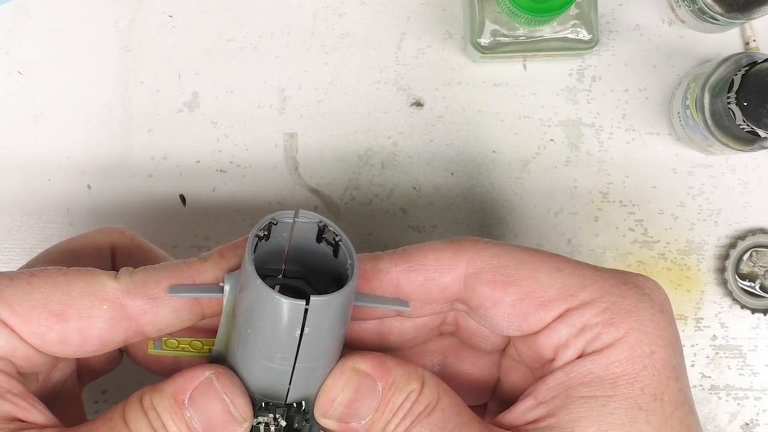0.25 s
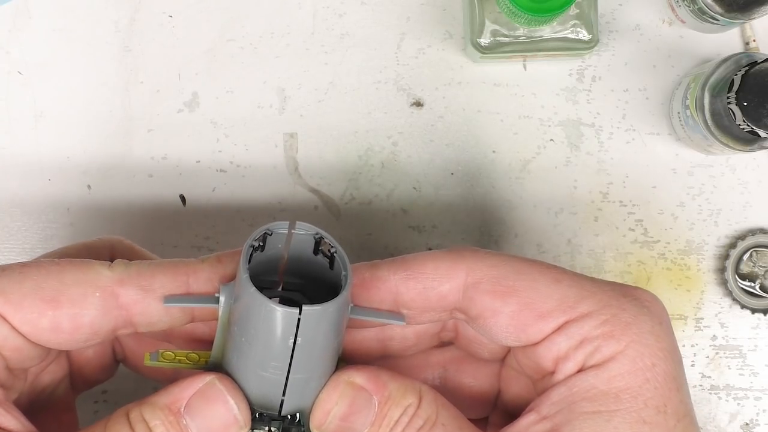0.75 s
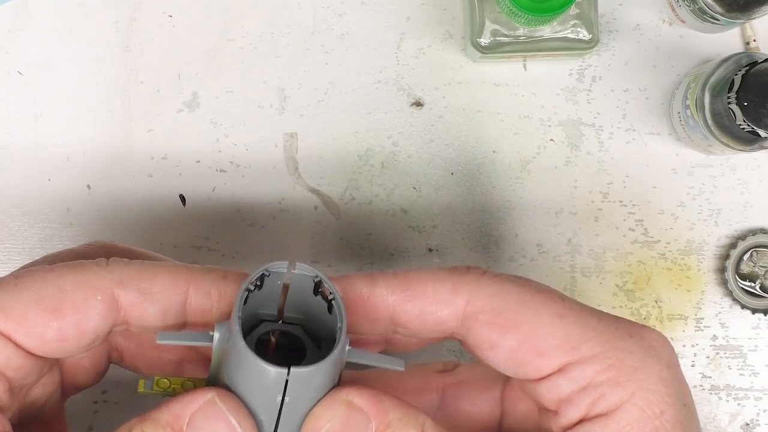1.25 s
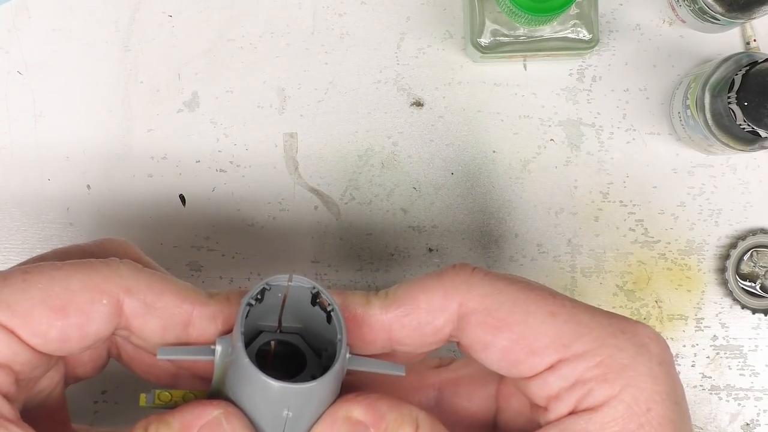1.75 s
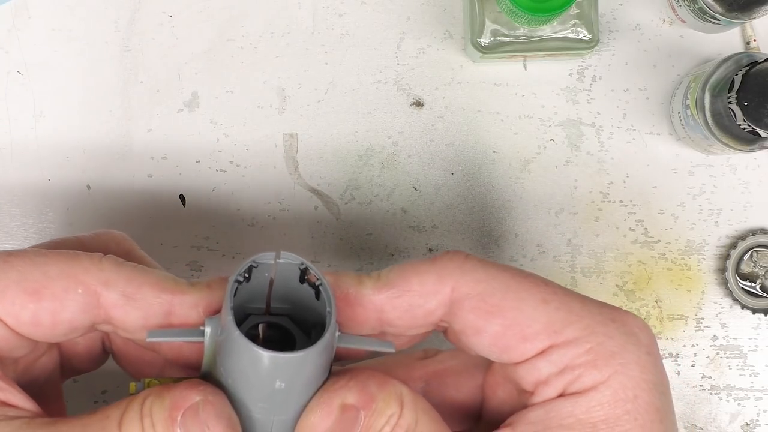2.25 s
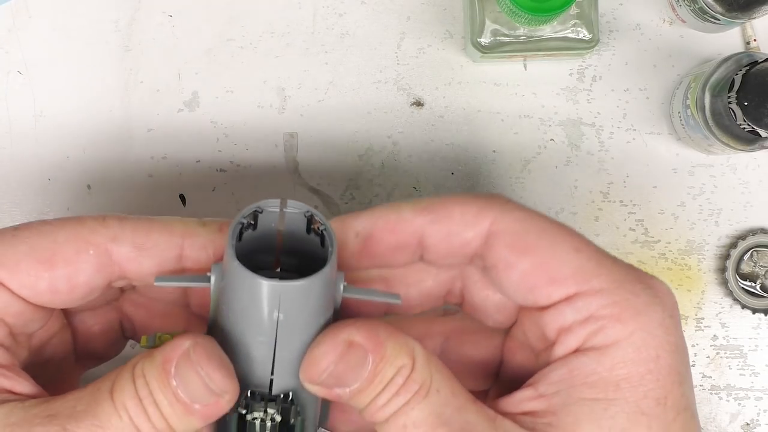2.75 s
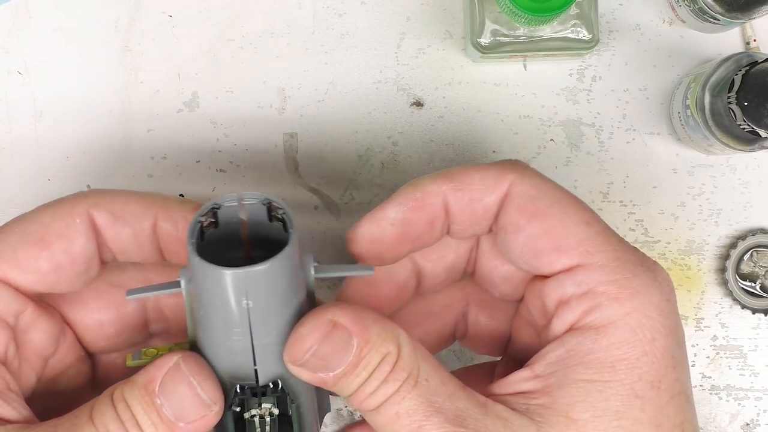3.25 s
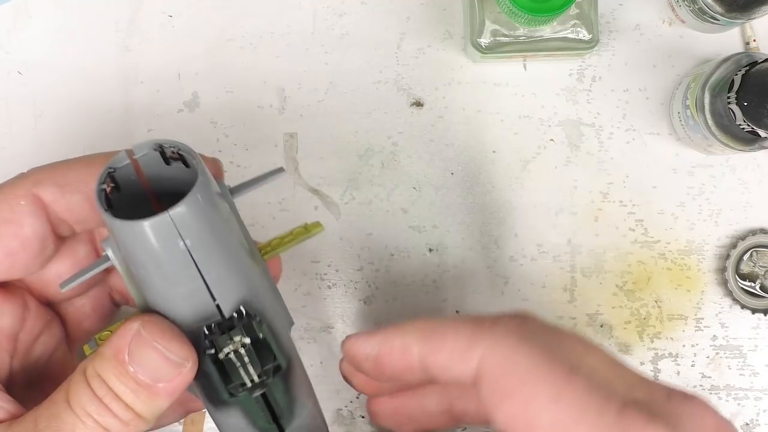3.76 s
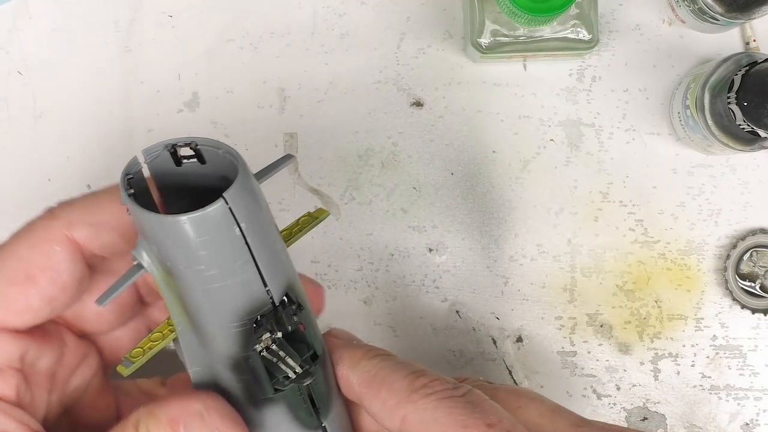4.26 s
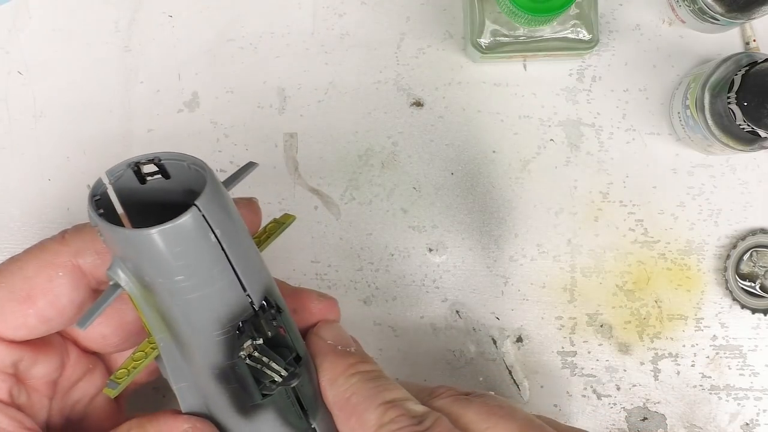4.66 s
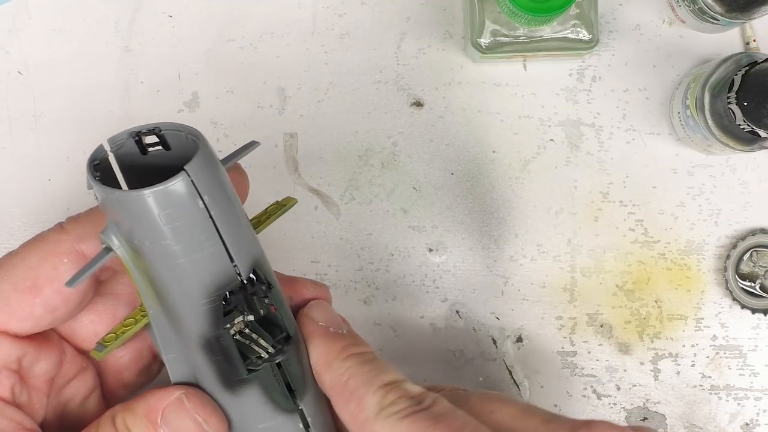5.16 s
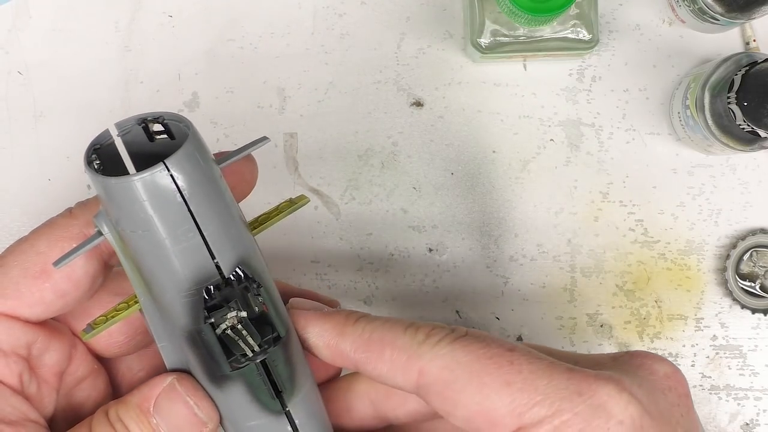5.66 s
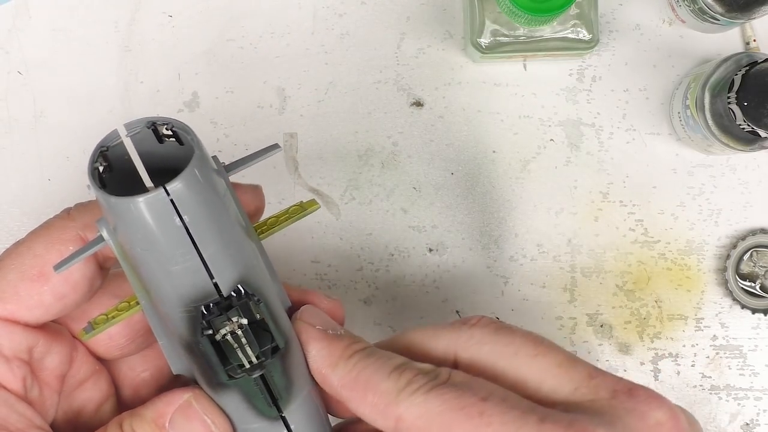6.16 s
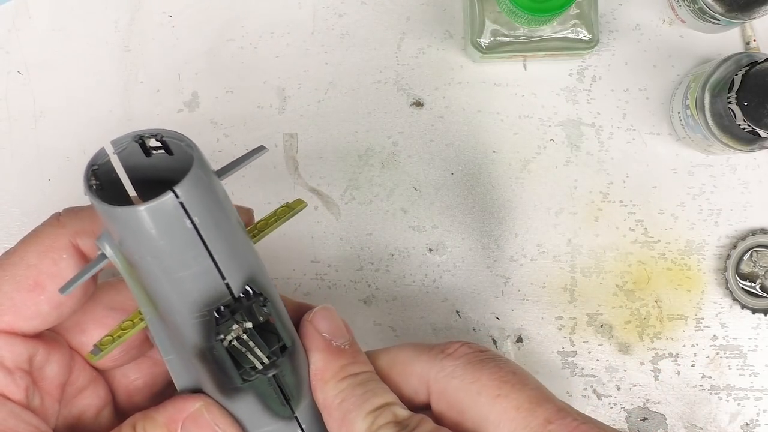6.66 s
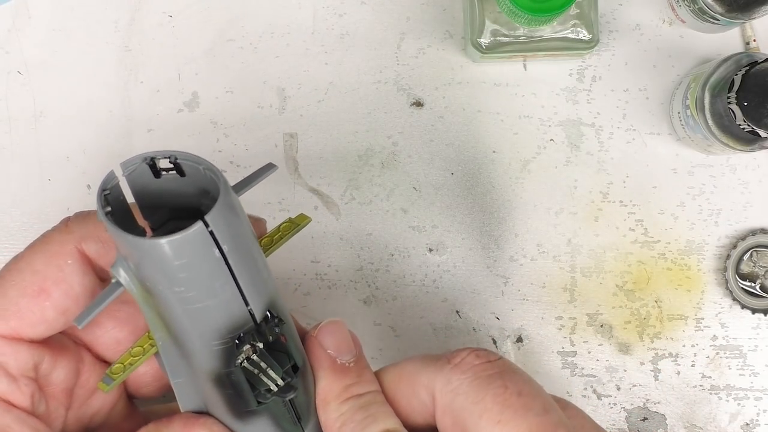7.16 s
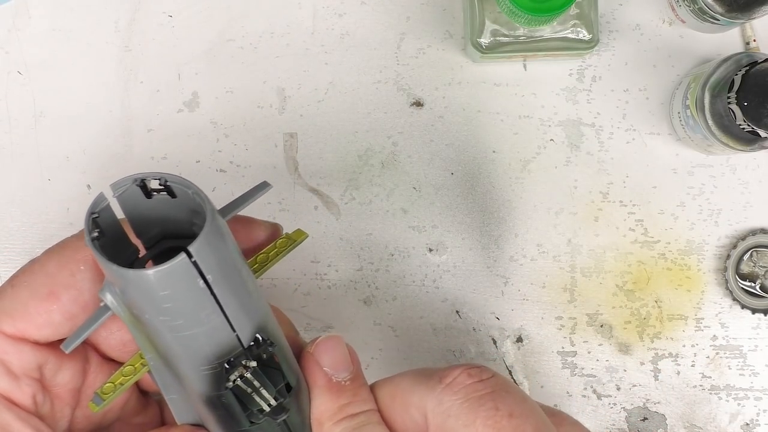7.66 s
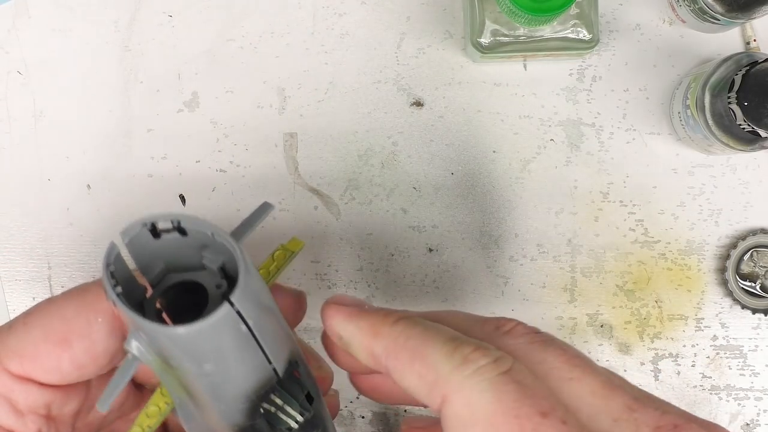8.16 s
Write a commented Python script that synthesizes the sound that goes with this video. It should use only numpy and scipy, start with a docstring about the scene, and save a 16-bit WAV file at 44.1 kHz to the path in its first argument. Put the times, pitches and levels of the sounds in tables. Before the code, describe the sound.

Close, dry plastic clicks and small ticks with light skin scuffs, the loudest snap late, above soft hiss, hum and a distant motor.

```python
"""Hollow plastic shell snapped together

Two halves of a hollow plastic model fuselage are pressed together by hand over a workbench.
Edges tick and snap home: damped shell modes under short noise cracks. Fingertips slide (grainy
filtered noise), squeak (jittered sines) and creak as the grip shifts; a small room answers.
Behind: rumble and mains hum, a faint electric buzz, a far motor, faint tones and microphone hiss."""
import sys
import numpy as np
from scipy import signal
from scipy.fft import rfft, irfft, next_fast_len
from scipy.io import wavfile
from scipy.ndimage import map_coordinates

SR = 44100
rng = np.random.default_rng(int(sys.argv[2]) if len(sys.argv) > 2 else 0)


def log_audio(samples):
    """Write samples as a 16-bit WAV file to the path given in sys.argv[1]."""
    # one column per channel
    frames = np.atleast_2d(samples).T
    # limit to full scale, then quantise
    limited = np.clip(frames, -1, 1)
    pcm = np.round(limited * 32767).astype(np.int16)
    wavfile.write(sys.argv[1], SR, pcm)


N = 370881

# fingertip slides: peak time t/s, hiss level/dB, shell scrape level/dB, length (rise + fall sigma)/s,
# favoured resonance f/Hz
SLIDES = [(0.95, -51.5, -61, .041, 4400), (1.03, -64.5, -63, 0.099, 4170), (1.197, -52.5, -57, 0.044, 4250),
          (3.015, -65, -69, 0.024, 2600), (3.377, -60, -60.5, 0.016, 3600), (3.44, -76, -62, .06, 1990),
          (3.544, -70, -63.5, 0.022, 2000), (4.047, -70, -68.5, 0.092, 2600),
          (4.164, -68, -57.5, 0.02, 2300), (4.2, -69, -51.5, .025, 3620), (4.31, -61.5, -65, 0.091, 3360),
          (4.489, -63, -68, 0.058, 4430), (4.553, -60.5, -66, .035, 2600), (5.043, -71, -64, 0.21, 2660),
          (5.945, -71, -70.5, .1, 2620), (6.059, -66, -68, 0.019, 2620), (6.134, -73, -63, .09, 2600),
          (6.98, -72, -66, 0.097, 2600), (7.926, -66, -63.5, 0.088, 2600), (8.40, -56, -60, 0.034, 2330)]


def amp(db):
    """Decibels to amplitude ratio."""
    return 10 ** (np.asarray(db) / 20)


def unit(x):
    """x scaled to rms 1."""
    return x / np.sqrt(np.mean(x ** 2) + 1e-20)


def clock():
    """Sample times in seconds."""
    return np.arange(N) / SR


def along(points, hz):
    """Interpolate (f/Hz, value) points on a log frequency axis."""
    f, v = np.transpose(points)
    return np.interp(np.log(hz + 1), np.log(f + 1), v)


def wobble(rate_hz):
    """Smooth random curve with rate_hz knots a second."""
    knots = rng.standard_normal(4096)
    coarse_s = np.arange(N // 32 + 1) * 32 / SR
    curve = map_coordinates(knots, [coarse_s * rate_hz], mode="wrap")
    return np.interp(clock(), coarse_s, curve)


def swell(peak_s, rise_s, fall_s):
    """Gaussian bell peaking at peak_s, with separate rise and fall sigmas."""
    t = clock() - peak_s
    sigmas = t / np.where(t < 0, rise_s, fall_s)
    return np.exp(-.5 * np.minimum(sigmas ** 2, 100))


def tone(hz, waver_rad):
    """Sine of rms 1 with randomly wandering phase."""
    phase = 2 * np.pi * np.cumsum(np.broadcast_to(hz, N)) / SR
    return np.sqrt(2) * np.sin(phase + waver_rad * wobble(7.6))


def filtered(x, response):
    """Apply a real response of frequency, zero phase."""
    n = x.shape[-1]
    m = next_fast_len(n + 8192, True)
    return irfft(rfft(x, m) * response(np.fft.rfftfreq(m, 1 / SR)), m)[..., :n]


def rush(spectrum):
    """Stereo noise of rms 1, its left-right correlation set per frequency by a mid/side split."""
    # left-right correlation: f/Hz, correlation
    likeness = [(25, .25), (60, 0.91), (130, 0.58), (290, 0.3), (640, 0.8), (1400, 0.26), (3100, 0.24),
                (6800, 0.87), (15000, 0.39)]

    def mid_side(hz):
        turn = np.arccos(np.clip(along(likeness, hz), -1, 1)) / 2
        return amp(along(spectrum, hz)) * [np.cos(turn), np.sin(turn)]

    mid, side = filtered(rng.standard_normal((2, N)), mid_side)
    return unit(np.array([mid + side, mid - side]))


def placed(x, pan_db):
    """Near source, pan_db louder on the left."""
    return x * amp([[pan_db / 2], [-pan_db / 2]])


def air_hiss(level_db=-62.0):
    """Steady broadband microphone hiss."""
    # hiss spectrum: f/Hz, relative density/dB
    spectrum = [(330, -22), (560, -17.5), (618, -23), (710, -7), (783, -12), (1080, -4.5), (1600, -6),
                (1860, -9), (1940, -4), (2400, -7.5), (3170, -12.5), (3690, -12), (5700, -25.5),
                (10700, -19), (15800, -17)]
    return amp(level_db) * rush(spectrum)


def room_rumble(level_db=-60.5, heave_s=8.28, heave_db=5, heave_sigma_s=.13):
    """Low-frequency room noise, swelling once as the hands shift."""
    # rumble spectrum: f/Hz, relative density/dB
    spectrum = [(20, -21.5), (55, -14.5), (82, -10.5), (98, -3), (122, -3), (150, -11), (200, -13),
                (270, -9.5), (330, -16.5), (470, -18), (570, -32.5), (800, -46), (1500, -85)]
    heave = heave_db * swell(heave_s, heave_sigma_s, heave_sigma_s)
    return amp(level_db + heave) * rush(spectrum)


def mains_hum():
    """Low mains harmonics with wandering phase."""
    # hum lines: f/Hz, rms level/dB
    lines = [(100, -69), (120, -67)]
    return sum(amp(db) * tone(hz, waver_rad=0.71) for hz, db in lines)


def buzz_gain(waver_db=0.9, sink_s=0.13):
    """Level heard in the buzz band: it wavers, and three times dips and comes back."""
    # level dips: onset t/s, nominal depth/dB, onset to start of return/s, return/s
    dips = [(2.58, -14, .1, 0.7), (5.72, -5.5, .1, 1.3), (7.27, -15, .56, .17)]
    t = clock()
    dip_db = 0
    for s, depth_db, down_s, return_s in dips:
        sinking = np.clip((t - s) / sink_s, 0, 1)
        returning = np.clip(1 - (t - s - down_s) / return_s, 0, 1)
        dip_db = dip_db + depth_db * sinking * returning
    return amp(dip_db + waver_db * wobble(7.4))


def electric_buzz(noise_db=-70):
    """Cluster of lines near 2 kHz over a narrow noise band, sharing one gain."""
    # buzz lines: f/Hz, rms level before buzz_gain/dB
    lines = [(1889, -83), (1949, -72), (2008, -75.5), (2126, -76.5), (2186, -80.5), (2250, -76)]
    # buzz noise spectrum: f/Hz, relative density/dB
    band = [(1500, -56), (1850, -5.5), (1970, -9), (2100, -8), (2250, -24), (2450, -22), (3000, -42)]
    buzz = sum(amp(db) * tone(hz, waver_rad=.25) for hz, db in lines)
    return buzz_gain() * (buzz + amp(noise_db) * rush(band))


def motor_gain(idle_db=-67.5):
    """The far motor idles, with slow surges."""
    # motor surges: peak t/s, gain/dB, sigma/s
    surges = [(0.497, 9, 0.51), (7.803, 7, 0.51)]
    return amp(idle_db + sum(db * swell(s, sigma, sigma) for s, db, sigma in surges))


def far_motor(start_hz=237.7, rise_hz_per_s=3.3, noise_db=-5.0, line_db=-6):
    """Exhaust noise plus one line that climbs as the motor slowly gains speed."""
    # f/Hz, relative density/dB
    exhaust = rush([(60, -24), (130, -2.5), (240, 0.5), (480, -1), (600, -12.5),
                    (720, -9), (1200, -24), (3000, -71)])
    line = tone(start_hz + rise_hz_per_s * clock(), waver_rad=0.94)
    return motor_gain() * (amp(noise_db) * exhaust + amp(line_db) * line)


def faint_tones():
    """Sines of fixed nominal pitch that come and go."""
    # tones: f/Hz, rms level at peak/dB, peak t/s, sigma/s
    tones = [(491, -71.5, 8.03, 0.46), (483, -74.5, 5.86, 1.33), (477, -69.5, .3, 0.58),
             (509, -75, .5, 0.97), (557, -70.5, 8.66, 0.83), (660, -75, 0.57, 0.44), (685, -84, 2.8, 5.6),
             (200, -74.5, 5.1, 3.4), (1350, -75, 3.35, 0.24)]
    return sum(amp(db) * swell(s, sigma, sigma) * tone(hz, waver_rad=1.0)
               for hz, db, s, sigma in tones)


def background():
    """Sum of the layers behind the hands."""
    return (air_hiss() + room_rumble() + mains_hum() + electric_buzz()
            + far_motor() + faint_tones())


def room(x, build_up_s=0.0063, side_db=-4):
    """Noise-tail reverb: the walls' answer builds up, then each frequency decays at its own rate."""
    # wall decay: f/Hz, t60/s
    walls = [(300, 0.53), (1200, 0.74), (2200, 0.58), (4000, 0.57), (8000, 0.41), (15000, 0.46)]
    hz, t, z = signal.stft(rng.standard_normal((2, int(.7 * SR))), SR, nperseg=256)
    decay = amp(-60 * t / along(walls, hz)[:, None])
    shape = decay * (1 - np.exp(-t / build_up_s))
    # f/Hz, relative level/dB
    colour_db = along([(300, 4), (2000, 1.0), (7000, 5.5), (11000, -2.0), (15000, -4.0)], hz)
    mid, side = signal.istft(z * shape * amp(colour_db)[:, None], SR, nperseg=256)[1]
    side = amp(side_db) * side
    tail = np.array([mid + side, mid - side]) / np.linalg.norm(mid)
    return signal.fftconvolve(x[None], tail, axes=1)[:, :N]


def diffused(x, blur_hz=380):
    """The walls hear the shell from every side: one even burst, its spectral peaks blurred."""
    power = np.abs(rfft(x)) ** 2
    offset_hz = np.arange(-400, 401) * SR / len(x)
    bell = np.exp(-(2 * offset_hz / blur_hz) ** 2)
    power = np.abs(signal.fftconvolve(power, bell / bell.sum(), "same"))
    # zero-phase burst, centred 5 ms in
    return np.roll(irfft(np.sqrt(power), len(x)), SR // 200)


def palms(grain_db=2.5):
    """The hands tighten their grip: soft, dull creaks of skin from grainy noise."""
    # creak spectrum: f/Hz, relative density/dB
    spectrum = [(200, -9), (400, -5), (580, -15), (720, 0.5), (950, -5.5), (1400, -8), (2200, -26)]
    # grip shifts: peak t/s, level/dB, sigma/s
    grips = [(1.37, -68.5, 0.15), (1.625, -70.5, 0.09), (3.098, -71.5, 0.11), (3.38, -69, 0.074),
             (8.25, -66, 0.33)]
    grains = rng.standard_normal(N) * amp(grain_db * wobble(110))
    creaks = unit(filtered(grains, lambda hz: amp(along(spectrum, hz))))
    return creaks * sum(amp(db) * swell(s, sigma, sigma) for s, db, sigma in grips)


def squeaks(jitter=0.027, flutter_db=4.0):
    """Nearly regular stick and slip of skin: thin, rough whistles on a jittered clock."""
    # squeaks: peak t/s, f/Hz, peak amplitude before flutter/dB, sigma/s
    strokes = [(3.298, 6370, -72, .012), (4.182, 7570, -50, 0.0095), (4.208, 7570, -50, 0.0091),
               (5.07, 11800, -70, .025), (7.163, 11900, -68, .012)]
    jittered_s = np.cumsum(1 + jitter * wobble(1300)) / SR
    whistle = sum(amp(db) * swell(s, sigma, sigma) * np.sin(2 * np.pi * hz * jittered_s)
                  for s, hz, db, sigma in strokes)
    return whistle * amp(flutter_db * wobble(300))


def fingers(grain_db=1.0, judder_db=2.0, favour_db=10, width_hz=170, rise_share=0.38):
    """Skin ridges catch and let go: grainy hiss, plus a duller scrape at the shell resonance."""
    # sliding skin spectrum: f/Hz, relative density/dB
    skin = [(710, -37), (1200, -20), (1540, -19), (1990, -1), (2530, -29), (3310, -7), (4280, -6),
            (5730, -5.5), (9420, 1), (14000, -3), (15800, -6)]
    # shell under a finger: f/Hz, relative density/dB
    rubbed = [(1000, -20), (1350, -11), (1650, -7), (2000, 3), (2600, -2), (3100, -6), (4400, -8),
              (5400, -20), (8000, -32)]
    slips = rng.standard_normal(N) * amp(grain_db * wobble(400) + judder_db * wobble(70))
    hiss = unit(filtered(slips, lambda hz: amp(along(skin, hz))))
    out = np.zeros(N)
    for s, hiss_db, shell_db, length_s, ring_hz in SLIDES:
        near = np.abs(clock() - s) < .4

        def shell(hz):
            resonance_db = favour_db / (1 + ((hz - ring_hz) / width_hz) ** 2)
            return amp(along(rubbed, hz) + resonance_db)

        scrape = unit(filtered(slips[near], shell))
        stroke = swell(s, rise_share * length_s, (1 - rise_share) * length_s)[near]
        out[near] += stroke * (amp(hiss_db) * hiss[near] + amp(shell_db) * scrape)
    return out


def contacts():
    """Plastic touches as rows: t/s, level/dB, crack/dB, room send/dB, hardness/(dB/oct), place."""
    # snaps (an edge catches, lets go, rebounds): t/s, level/dB, crack re ring/dB, hardness/(dB/oct),
    # catch lead/s, catch re snap/dB, rebound delay/s, rebound re snap/dB,
    # rebound hardness/(dB/oct), place
    snaps = [(1.5285, -25, -7.5, 1, 0.0031, -7.5, .0083, -15, -11, "nose"),
             (4.1762, -35, -12, 0.4, .004, -23, 0.0049, -6, -4, "seam"),
             (7.327, -16.5, -10.5, -2.7, 0.0016, -15, .005, -13, 7.5, "tail")]
    # edge ticks: t/s, ring level as if its energy filled 10 ms/dB, crack re ring/dB,
    # hardness/(dB/oct), place
    ticks = [(.869, -55, -9, -5, "nose"), (.9, -62, -18, -10, "nose"), (1.042, -62, -2, 6, "seam"),
             (1.180, -62, 4, 3, "seam"), (1.364, -63, -6, -2, "nose"), (1.909, -60, -10, 1, "nose"),
             (1.913, -51.5, -10, -10, "nose"), (2.7712, -52, -10.5, -11, "nose"),
             (2.804, -64, -2, -5, "nose"), (2.861, -58, -1, -9, "nose"), (2.892, -49.5, -8, -15, "nose"),
             (3.445, -58, -17, -16, "nose"), (5.388, -60, -6, -1, "seam"), (5.764, -60, -10, -6, "tail"),
             (6.4436, -58, -16, -10, "tail"), (6.926, -53, -18, -4, "nose"), (6.9367, -46, -3.5, 1, "seam"),
             (7.766, -55, -5.5, -8, "tail"), (7.883, -50, -3.5, -10, "tail")]
    # the catch cracks less than the snap, the rebound more
    catch_crack_db, rebound_crack_db = -13, 3.5
    catch_room_db, snap_room_db, rebound_room_db, tick_room_db = -22, -20, -16.5, -15.5
    grit_db, grit_crack_db = -4.5, -5  # level re scrape, crack re ring
    rows = []
    for (s, db, crack_db, hardness, lead_s, catch_db,
         delay_s, rebound_db, rebound_hardness, place) in snaps:
        rows.append((s - lead_s, db + catch_db, crack_db + catch_crack_db, catch_room_db, 0, place))
        rows.append((s, db, crack_db, snap_room_db, hardness, place))
        rows.append((s + delay_s, db + rebound_db, crack_db + rebound_crack_db,
                     rebound_room_db, rebound_hardness, place))
    for s, db, crack_db, hardness, place in ticks:
        rows.append((s, db, crack_db, tick_room_db, hardness, place))
    # each sliding finger jogs the edges once
    for (s, _, shell_db, length_s, _), chance in zip(SLIDES, rng.random(len(SLIDES))):
        rows.append((s + (chance - .5) * length_s, shell_db + grit_db, grit_crack_db,
                     tick_room_db, 0, "seam"))
    return rows


def clicks(attack_s=0.00058, crack_attack_s=0.00051, crack_t60_s=0.033, scatter_db=2.2,
           phase_spread_rad=0.95, radiation_hz=1000, grip_t60_s=0.14):
    """Each contact rings the shell's modes by place, under a short broad crack: (direct, room send)."""
    # shell modes: f/Hz, t60 before grip damping/s, nominal level struck at nose/dB, seam/dB, tail/dB
    shell_modes = [(1020, .04, -32, -9, -30), (1248, .035, -24, -3, -28), (1350, .03, -28, -10, -16),
                   (1480, .04, -20, -7, -10), (1645, .03, -20, -7, -12), (1803, .036, -16, -9, 0),
                   (2000, .036, -3, -2, -14), (2130, .03, -9, -4, -13), (2295, .036, -22, -7, 0),
                   (2395, .028, -6, -7, -11), (2608, .036, 0, 0, -5), (2840, .03, -6, -12, -7),
                   (2968, .033, -5, -4, -18), (3043, .033, -15, -16, -5), (3305, .026, -23, -4, -10),
                   (3462, .033, -21, -5, -7), (3630, .028, -24, -4, -21), (4143, .035, -21, -18, -11),
                   (4325, .035, -10, -16, -13), (4480, .028, -24, -7, -20), (4635, .028, -23, -6, -25),
                   (4830, .032, -26, -13, -19), (5058, .034, -24, -11, -15), (6600, .025, -18, -22, -16),
                   (7980, .022, -22, -22, -13), (11400, .016, -22, -26, -16)]
    # f/Hz, relative density/dB
    crack_colour = [(100, -14), (320, -0.5), (460, -21), (660, -1), (900, -10), (2000, -1.5),
                    (4000, 3.0), (5600, 3.0), (8000, 2.5), (11000, 2.5), (14000, -7.0),
                    (15000, -6), (15800, -26)]
    hz, t60_s, *shapes = np.transpose(shell_modes)[:, :, None]
    strength_db = dict(zip(("nose", "seam", "tail"), shapes))
    # so small a shell radiates almost no bass
    small_shell = signal.butter(4, radiation_hz, "high", fs=SR, output="sos")
    t = np.arange(SR // 10) / SR

    def sized(x):
        """Scale to the energy of 10 ms at rms 1."""
        return x / np.sqrt(np.sum(x ** 2) / (SR / 100))

    direct, sent = np.zeros((2, N + SR))
    for s, db, crack_db, room_db, hardness, place in contacts():
        size, phase = rng.standard_normal((2, len(shell_modes), 1))
        struck_db = strength_db[place] + hardness * np.log2(hz / hz.mean()) + scatter_db * size
        # the gripping fingers damp every mode
        fading_db = 60 * t / t60_s + 60 * t / grip_t60_s
        modes = amp(struck_db - fading_db) * np.sin(2 * np.pi * hz * t + phase_spread_rad * phase)
        ring = signal.sosfilt(small_shell, modes.sum(0) * (1 - np.exp(-t / attack_s)))
        crack = filtered(rng.standard_normal(len(t)), lambda f: amp(along(crack_colour, f)))
        crack = crack * amp(-60 * t / crack_t60_s) * (1 - np.exp(-t / crack_attack_s))
        click = amp(db) * (sized(ring) + amp(crack_db) * sized(crack))
        start = round(s * SR)
        direct[start:][:len(t)] += click
        # the cupped hands shield the room from some clicks more than from others
        sent[start:][:len(t)] += amp(room_db) * diffused(click)
    return direct[:N], sent[:N]


def scene():
    """The shell and hands up close, the room's answer and the background."""
    direct, sent = clicks()
    rubbing = fingers() + palms()
    close = placed(direct + rubbing + squeaks(), pan_db=1.7)
    return close + room(sent + amp(-19.0) * rubbing) + background()


def record(dry):
    """Brick-wall low-pass: nothing passes at or above 15830 Hz."""
    return filtered(dry, lambda hz: hz < 15830)


dry = scene()
out = record(dry)
log_audio(out)
```